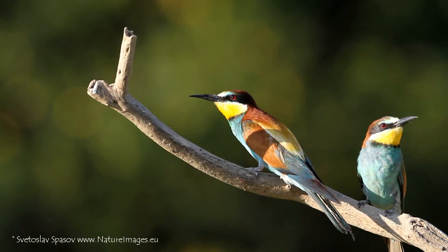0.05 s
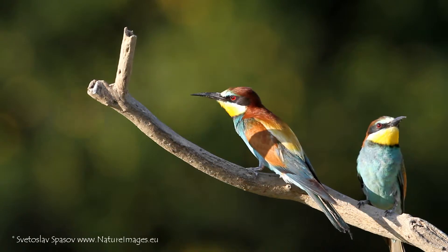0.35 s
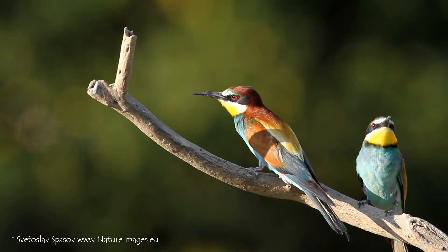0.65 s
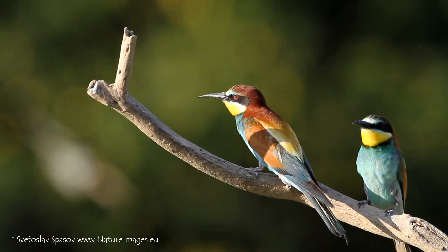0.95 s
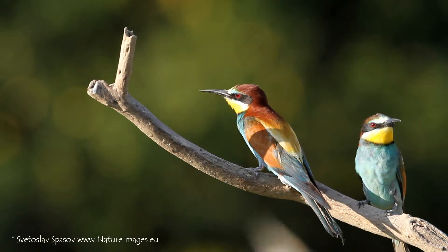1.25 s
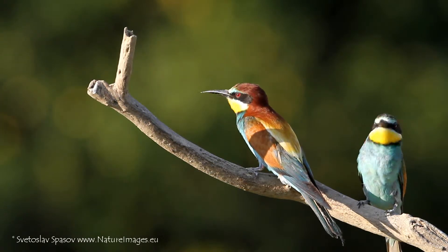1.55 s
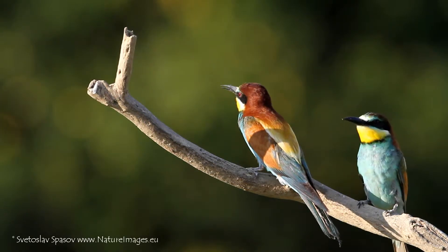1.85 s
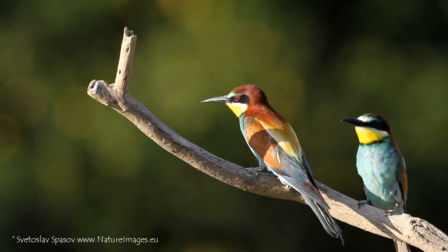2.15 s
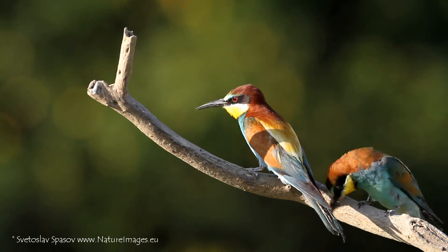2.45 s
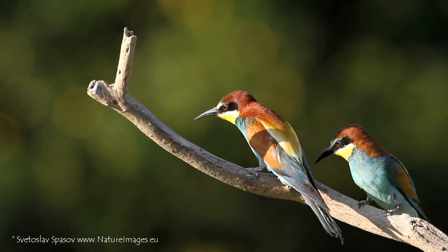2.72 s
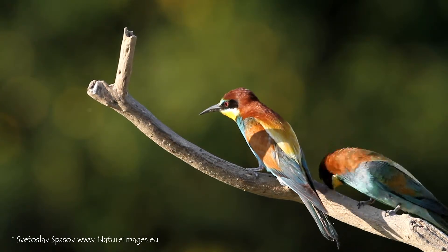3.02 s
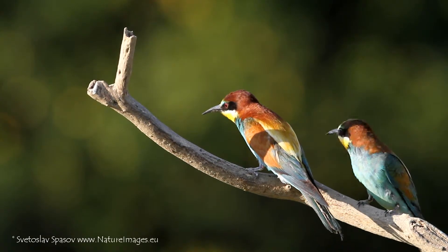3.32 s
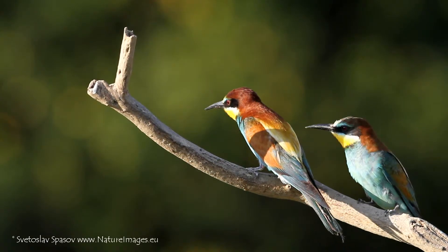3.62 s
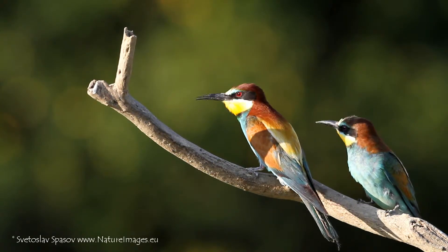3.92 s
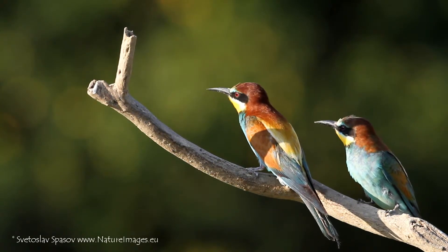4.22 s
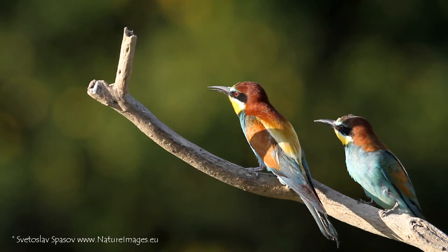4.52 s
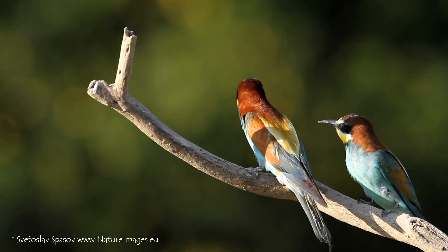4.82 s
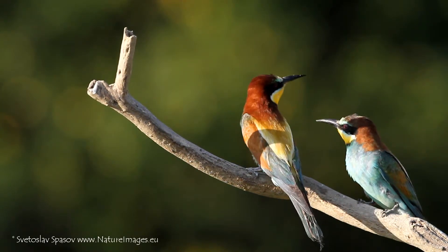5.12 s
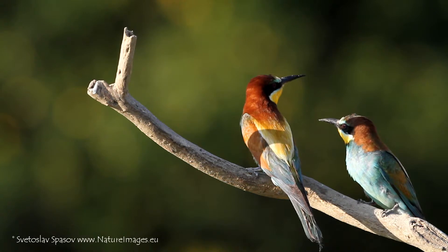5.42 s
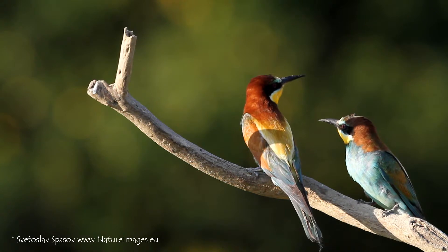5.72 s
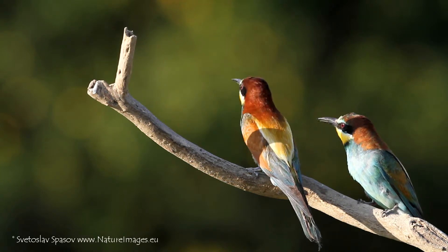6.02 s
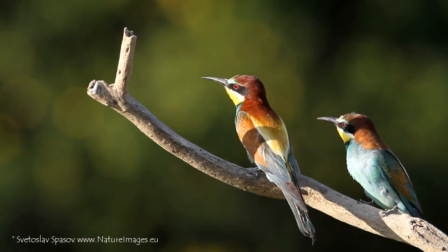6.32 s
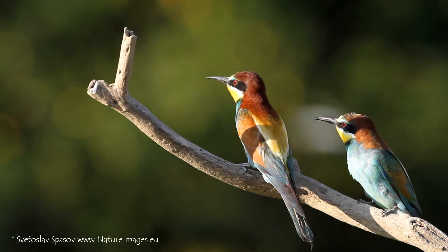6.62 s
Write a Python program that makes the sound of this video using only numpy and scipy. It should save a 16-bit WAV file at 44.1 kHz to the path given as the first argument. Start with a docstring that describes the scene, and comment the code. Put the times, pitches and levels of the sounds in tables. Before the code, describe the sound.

Birds give short, rolling whistles and upswept pips near and far, over a faint rumble, hiss and distant engine.

```python
"""Bee-eaters on a branch

Bee-eaters chatter near the microphone and farther off: short arched whistles that overlap, and a few
dry rasps, clicks of the syrinx ringing the throat. Wings rustle past, claws and bills tick on the wood,
and the trees send back a faint echo. Far off a small bird chirps, over a low rumble, the fading hum
of a distant engine and a steady hiss."""
import sys
import numpy as np
from scipy import signal
from scipy.fft import rfft, irfft, next_fast_len
from scipy.io import wavfile
from scipy.ndimage import map_coordinates

SR = 44100
rng = np.random.default_rng(int(sys.argv[2]) if len(sys.argv) > 2 else 0)


def transcribe(signal):
    """Save signal, clipped to [-1, 1], as a 16-bit WAV file at the path in sys.argv[1]."""
    frames = np.atleast_2d(signal).T
    limited = np.clip(frames, -1, 1)
    pcm = np.round(limited * 32767).astype(np.int16)
    wavfile.write(sys.argv[1], SR, pcm)


N = 298116
TIME = np.arange(N) / SR
FULL_VOICE_DB = -13.5  # a call from the birds nearest the microphone

# long arched calls: crest t/s, rise/s, shoulder f/Hz, crest f/Hz, level/dB, relative overtone level/dB
ROLLS = [(0.178, 0.035, 2066, 2390, -37.5, -37), (.574, 0.042, 1917, 2115, -33, -31),
         (.686, .048, 2040, 2444, -38, -29), (.725, .045, 2170, 2440, -37.5, -32),
         (0.965, 0.043, 2000, 2300, -27.5, -32), (1.354, .046, 1950, 2220, -42, -39),
         (1.573, 0.038, 1935, 2430, -42.5, -35), (2.137, .038, 2010, 2360, -43, -36),
         (2.234, .027, 2040, 2120, -55.5, -30), (2.345, 0.043, 1993, 2400, -44.5, -35),
         (2.523, 0.044, 2008, 2390, -48.5, -28), (2.553, 0.043, 2070, 2400, -57, -21),
         (2.877, .043, 1880, 1980, -33, -28), (2.904, 0.025, 1940, 2430, -42, -37),
         (3.044, 0.035, 1730, 1895, -35.5, -40), (3.136, 0.032, 1960, 2450, -54.5, -37),
         (3.226, .019, 1900, 2000, -40.5, -28), (3.353, 0.052, 2070, 2550, -44, -36),
         (3.381, 0.026, 2070, 2510, -43.5, -34), (3.407, 0.031, 1950, 2365, -39.5, -36),
         (3.448, .042, 1835, 1953, -31, -42), (3.554, .034, 1960, 2410, -43.5, -36),
         (3.629, .039, 1957, 2250, -23, -34.5), (3.714, 0.022, 1868, 1944, -30.5, -39),
         (3.749, 0.041, 1893, 1960, -30.5, -34), (4.358, 0.022, 2010, 2336, -45.5, -40),
         (4.386, .035, 1950, 2390, -40, -31), (4.505, 0.019, 1900, 2080, -36.5, -28),
         (4.646, 0.041, 1907, 2156, -40.5, -25), (5.554, 0.036, 1960, 2387, -41.5, -34),
         (5.789, 0.042, 1818, 1797, -26.5, -38), (6.382, 0.038, 1950, 2423, -36, -28)]
# short upswept calls: crest t/s, rise/s, crest f/Hz, level/dB, relative overtone level/dB
PIPS = [(.149, 0.03, 2186, -36, -23), (.533, .025, 2150, -45, -30), (0.892, 0.027, 2577, -33, -28),
        (1.77, 0.021, 2410, -68, -30), (3.71, 0.018, 2530, -34, -40), (3.775, 0.025, 2210, -36.5, -29),
        (3.827, 0.024, 2650, -32.5, -25), (3.937, 0.029, 2400, -40, -31), (4.225, .03, 2440, -38, -38),
        (4.423, 0.0302, 2286, -41, -17.5), (4.657, 0.026, 2210, -22.5, -24.5),
        (4.729, .027, 2170, -23.5, -38), (4.76, 0.03, 2426, -19, -28), (4.831, 0.035, 2250, -38, -21),
        (4.955, .034, 2490, -17, -27), (5.115, .033, 2314, -20, -27), (5.276, .018, 2240, -45, -26),
        (5.306, 0.039, 2376, -35.5, -28), (5.497, 0.031, 2325, -36, -26), (5.585, .027, 2500, -34, -27),
        (5.795, .022, 2235, -38.5, -21), (5.83, .028, 2340, -36.5, -19.5), (5.964, 0.036, 2574, -20, -35.5),
        (6.071, 0.019, 1894, -40, -25), (6.124, .026, 2260, -35.5, -25), (6.198, 0.039, 2483, -21, -32.5),
        (6.468, .027, 2410, -56, -22)]
# soft low contact notes: crest t/s, crest f/Hz, level/dB
PEEPS = [(3.165, 1400, -55), (3.275, 1734, -41.5), (3.411, 1725, -39), (3.678, 1774, -40),
         (3.999, 1630, -42.5), (4.293, 1595, -50), (4.321, 1660, -50), (4.352, 1680, -52),
         (4.391, 1600, -47)]
# how well the throat carries each pitch: f/Hz, gain/dB
THROAT_GAIN = [(1200, 1), (1450, 0), (1650, 0.5), (1850, 0.5), (2000, -1), (2200, 1), (2450, 0),
               (2650, -2.5)]
# second, third and fourth harmonic of a whistle: relative level/dB
OVERTONES_DB = [0, -5, -11]
# what the open bill lets out of the overtones: f/Hz, gain/dB
BILL_GAIN = [(2800, 12), (3400, -2), (4200, 1), (5200, -1.5), (6200, -6), (7500, -8), (10000, -6)]
# dry rasps: start t/s, length/s, level/dB, throat size as a pitch factor
RASPS = [(3.911, 0.045, -46.5, 0.95), (4.018, 0.034, -46.5, 0.89), (6.522, 0.044, -41.5, 1.165),
         (6.616, 0.047, -44.5, 0.99)]
# throat resonances: f/Hz, width/Hz, gain/dB
THROAT_MODES = [(880, 170, -0.5), (1227, 230, 7.5), (2080, 1060, 7.5), (2600, 530, 1), (3980, 660, -19)]
# thin squeaks on some crests: middle t/s, half length/s, level/dB
SQUEAKS = [(.965, 0.0068, -56), (5.958, .012, -57), (6.195, .012, -55)]
# squeak spectrum: f/Hz, level/dB
SQUEAK_SPECTRUM = [(12000, -40), (13500, -4), (14700, 0), (15600, -8)]

# wing swishes: middle t/s, half length/s, level/dB
SWISHES = [(1.12, 0.052, -48), (1.375, 0.047, -50), (2.56, 0.023, -64), (2.695, 0.01, -63)]
# swish resonances: f/Hz, width/Hz, gain/dB
SWISH_MODES = [(1700, 300, 0), (2400, 900, -7), (3000, 260, -1), (4300, 1100, -12)]
# soft wing flutters: middle t/s, half length/s, level/dB
FLUTTERS = [(.8, 0.19, -55.5), (1.02, 0.017, -54)]
# flutter spectrum: f/Hz, level/dB
FLUTTER_SPECTRUM = [(400, -14), (900, -6.5), (1300, 1), (1800, -3), (2800, -11), (5000, -21.5)]
# feather rustles: middle t/s, half length/s, level/dB
RUSTLES = [(.77, .025, -63), (.86, 0.16, -62), (.97, 0.061, -71), (3.02, 0.086, -64), (5.15, 0.12, -63.5)]
# rustle spectrum: f/Hz, level/dB
RUSTLE_SPECTRUM = [(1500, -11), (4000, -7), (9000, -4.5), (14000, -5), (16000, -19)]
# taps on the branch: t/s, level/dB
TAPS = [(1.1052, -40), (2.561, -46), (2.614, -45), (2.688, -47), (3.0366, -45), (3.062, -47), (3.1701, -45)]
# resonances of the tapped wood: f/Hz, width/Hz, gain/dB
WOOD_MODES = [(3340, 1000, -6.5), (4640, 350, -1.5), (6300, 1400, -12)]

# high chirps of a small far bird: middle t/s, level/dB
CHIRPS = [(1.348, -71), (1.7, -70), (2.2, -71), (2.48, -67), (5.42, -69), (5.65, -67), (5.9, -67),
          (6.25, -71), (6.48, -68)]
# chirp spectrum: f/Hz, level/dB
CHIRP_SPECTRUM = [(4800, -37), (5900, 0), (6700, 2), (7100, -9), (7900, -35)]
# drone of the receding engine: t/s, level/dB
DRONE_LEVEL = [(0, -58), (2.4, -58.2), (4.7, -61), (6.76, -64.5)]
# drone spectrum: f/Hz, level/dB
DRONE_SPECTRUM = [(150, -5), (260, -3.5), (330, 4), (520, 4.5), (800, 0.5), (1100, -3.5), (1600, -6),
                  (3000, -62)]
# the engine's note: t/s, f/Hz, level/dB
ENGINE_HUM = [(0, 451.7, -67.5), (1, 450, -65.5), (2.3, 442.2, -63), (4.2, 441.7, -66.5), (5.6, 436, -67),
              (6, 442, -76.5), (6.76, 443.5, -72)]
# slow drift of the rumble: t/s, level/dB
RUMBLE_LEVEL = [(0, -60.5), (2, -59.5), (2.9, -62), (4.7, -61), (5.1, -58.5), (6.76, -60)]
# rumble spectrum: f/Hz, level/dB
RUMBLE_SPECTRUM = [(13, -45), (22, -45), (46, -21), (81, -3.5), (114, 4), (210, -2), (257, -10), (330, -13),
                   (430, -36), (730, -120)]
# tones within the rumble: f/Hz, level/dB
LOW_TONES = [(59, -68.5), (120, -70.5), (171, -70.5), (207, -73)]
# spectrum of the open-air hiss: f/Hz, level/dB
HISS_SPECTRUM = [(600, 2.5), (1100, -0.5), (2000, 5.5), (2800, 0), (4000, 0), (5500, -1.5), (8000, -3),
                 (11000, -4.5), (14000, -4)]


def whistles(attack_s=0.0057, release_s=0.0034, jitter=0.0105, shimmer_db=1.5, patchy_db=3,
             fade_db_per_s=330, overtone_fade_db=4, scatter_slope=0.62):
    """Notes glide to a shoulder, flick over a crest and drop; returns direct and scattered sound."""
    direct, scattered = np.zeros(N), np.zeros(N)
    tremor = 1 + jitter * wobble(450)
    shimmer = amp(shimmer_db * wobble(300))
    brightness = amp(patchy_db * wobble(120) - patchy_db / 2)
    for s, rise, fall, crest_width, contour, db, swell_db, overtone_db in rolls() + pips() + peeps():
        start_hz, shoulder_hz, crest_hz, end_hz = contour
        span = slice(round((s - rise) * SR), round((s + fall) * SR))
        t = TIME[span] - s  # zero at the crest
        up, down = np.clip(1 + t / rise, 0, 1), np.clip(t / fall, 0, 1)
        arch = start_hz + (shoulder_hz - start_hz) * up ** 0.61 + (end_hz - shoulder_hz) * down ** 1.75
        pitch = arch + (crest_hz - shoulder_hz) * np.exp(-(t / crest_width) ** 2)
        phase = 2 * np.pi * np.cumsum(pitch * tremor[span]) / SR
        ramps = np.clip((t + rise) / attack_s, 0, 1) * np.clip((fall - t) / release_s, 0, 1)
        gate = np.sin(np.pi / 2 * ramps) ** 2
        # a note swells late, towards its crest, and dies away past it
        swell = amp(-swell_db * (1 - up ** 1.39) - fade_db_per_s * np.maximum(t, 0))
        fundamental = swell * amp(along(THROAT_GAIN, pitch)) * np.sin(phase)
        harmonics = sum(amp(level + along(BILL_GAIN, k * pitch)) * np.sin(k * phase)
                        for k, level in enumerate(OVERTONES_DB, 2))
        # the overtones barely swell: they are there from the start
        overtone_gain = amp(overtone_db - overtone_fade_db * down) * brightness[span] * swell ** 0.17
        note = amp(db) * gate * shimmer[span] * (fundamental + overtone_gain * harmonics)
        direct[span] += note
        # softer notes come from farther birds, so more is scattered on the way to the microphone
        scattered[span] += note * amp(scatter_slope * (FULL_VOICE_DB - db))
    return direct, scattered


def rolls(fall_share=0.62, crest_s=0.0028, flick_hz_per_s=110000, swell_db=8):
    """A roll climbs slowly, flicks over its crest and sinks back; a higher flick takes longer."""
    return [(s, rise, fall_share * rise, crest_s + (crest_hz - hz) / flick_hz_per_s,
             (0.82 * hz, hz, crest_hz, 0.805 * hz), db, swell_db, overtone_db)
            for s, rise, hz, crest_hz, db, overtone_db in ROLLS]


def pips(start_hz=1396, fall_s=0.0098, crest_s=0.00658, swell_db=16):
    """A pip sweeps up, swelling steeply, and breaks off just past its crest; loud ones plunge."""
    notes = []
    for s, rise, hz, db, overtone_db in PIPS:
        end_share = 0.69 + 0.007 * (FULL_VOICE_DB - db)
        contour = (start_hz, 0.855 * hz, hz, end_share * hz)
        notes.append((s, rise, fall_s, crest_s, contour, db, swell_db, overtone_db))
    return notes


def peeps(rise_s=0.013, fall_s=0.009, crest_s=0.0055, swell_db=8, overtone_db=-35):
    """A peep is one small low arch, always of the same length."""
    return [(s, rise_s, fall_s, crest_s, (0.76 * hz, 0.89 * hz, hz, 0.94 * hz), db, swell_db, overtone_db)
            for s, hz, db in PEEPS]


def rasps(clicks_per_s=430, jitter=0.24, spread_db=2.0, hiss=0.076, fade_db=7):
    """Uneven clicks of the syrinx ring the throat, with a little hiss between them."""
    out = np.zeros(N)
    for s, length, db, size in RASPS:
        t = np.arange(round((length + 0.03) * SR)) / SR
        cycles = np.cumsum(clicks_per_s * np.abs(1 + jitter * wobble(400)[:len(t)])) / SR
        clicks = np.diff(np.floor(cycles), prepend=-1) * amp(spread_db * rng.standard_normal(N)[:len(t)])
        source = clicks + hiss * rng.standard_normal(N)[:len(t)]
        voice = filtered(source, lambda f: resonances(THROAT_MODES, f / size) * lowpass(f / size, 4500, 10))
        envelope = amp(-fade_db * (t / length) ** 3) * np.clip((t[-1] - t) / 0.017, 0, 1)
        add(out, s, amp(db) * envelope * unit(voice))
    return out


def squeaks():
    """Thin puffs of very high noise sit on the crests of a few notes."""
    return swells(SQUEAKS) * noise(SQUEAK_SPECTRUM)


def wings(grain_db=2, flutter_db=3, crackle_db=4):
    """Wings swish and flutter past the microphone; feathers brush over each other in fine grains."""
    air = filtered(rng.standard_normal(N), lambda f: resonances(SWISH_MODES, f) * lowpass(f, 6500, 6))
    swish = swells(SWISHES) * unit(air * amp(grain_db * wobble(300)))
    flutter = swells(FLUTTERS) * unit(noise(FLUTTER_SPECTRUM) * amp(flutter_db * wobble(200)))
    rustle = swells(RUSTLES) * unit(noise(RUSTLE_SPECTRUM) * amp(crackle_db * wobble(250)))
    return swish + flutter + rustle


def taps(t60=0.035, gain_db=-2):
    """Claws and bills tick on the dry branch, briefly ringing the wood."""
    out, t = np.zeros(N), np.arange(SR // 20) / SR
    for s, db in TAPS:
        burst = rng.standard_normal(len(t)) * amp(-60 * t / t60)
        tick = filtered(burst, lambda f: resonances(WOOD_MODES, f))
        add(out, s, amp(db + gain_db) * tick / np.abs(tick).max())
    return out


def twigs(x, t60=0.045, gain_db=-18):
    """Nearby twigs and ground briefly smear each note, differently as the birds move."""
    out, t = np.zeros(N), np.arange(SR // 6) / SR
    for s in np.arange(0, TIME[-1] + 0.5, 0.5):
        tail = rng.standard_normal(len(t)) * amp(-60 * t / t60) * (1 - np.exp(-t / 0.0027))
        crossfade = np.clip(1 - 2 * np.abs(TIME - s), 0, 1)
        out += signal.oaconvolve(x * crossfade, tail / np.linalg.norm(tail))[:N]
    return amp(gain_db) * out


def trees(x, t60=1.0, foliage_db=-22.5, trunks_db=-20, delay_s=0.071, spread_s=0.041, count=18,
          centre_hz=2080, width_hz=800, dull_hz=2550):
    """Foliage scatters a thin, dull tail; farther trunks return a cluster of small repeats."""
    t = np.arange(SR * 3 // 4) / SR
    foliage = rng.standard_normal(len(t)) * amp(-60 * t / t60) * (1 - np.exp(-t / 0.0083))
    foliage *= amp(foliage_db) / np.linalg.norm(foliage)
    delays = delay_s + spread_s * np.linspace(-1, 1, count) + 0.004 * rng.standard_normal(count)
    arrivals = np.round(np.clip(delays, 0.01, 0.5) * SR).astype(int)
    trunks = np.bincount(arrivals, rng.standard_normal(count), len(t))
    trunks *= amp(trunks_db) / np.linalg.norm(trunks)
    echo = signal.fftconvolve(x, foliage + trunks)[:N]
    return filtered(echo, lambda f: resonances([(centre_hz, width_hz, 0)], f) * lowpass(f, dull_hz, 16))


def path_to_microphone(x, notch_hz=2298, width_hz=100, bounce=0.083, delay_s=0.002403):
    """One near reflection ripples the sound, and a narrow band cancels: notes blink gliding through it."""
    notch = lambda f: (notch_hz ** 2 - f * f) / (notch_hz ** 2 - f * f + 1j * f * width_hz)
    ripple = lambda f: 1 + bounce * np.exp(-2j * np.pi * f * delay_s)
    return filtered(x, lambda f: notch(f) * ripple(f))


def far_bird(half_length_s=0.036):
    """Distance blurs a small bird's chirps into soft narrow-band puffs."""
    return swells((s, half_length_s, db) for s, db in CHIRPS) * noise(CHIRP_SPECTRUM)


def distant_engine():
    """An engine recedes far from the microphone: a fading drone and a slowly sinking hum."""
    drone = amp(along(DRONE_LEVEL, TIME) + 0.49 * wobble(7.9)) * noise(DRONE_SPECTRUM)
    s, hz, db = np.transpose(ENGINE_HUM)
    return drone + wavering_tone(np.interp(TIME, s, hz), np.interp(TIME, s, db))


def ambience(hiss_db=-58.0):
    """The bed of the place: a low rumble with wavering tones, and an even hiss."""
    rumble = amp(along(RUMBLE_LEVEL, TIME)) * noise(RUMBLE_SPECTRUM)
    tones = sum(wavering_tone(hz, db) for hz, db in LOW_TONES)
    return rumble + tones + amp(hiss_db) * noise(HISS_SPECTRUM)


def wavering_tone(hz, db, waver_db=1.7, waver_hz=3.36):
    """A sine whose level and pitch wander."""
    gain = np.sqrt(2) * amp(db + waver_db * wobble(7.8))
    return gain * np.sin(2 * np.pi * np.cumsum(hz + waver_hz * wobble(18)) / SR)


def amp(db):
    """Decibels to gain."""
    return 10 ** (np.asarray(db) / 20)


def unit(x):
    """Scale to rms 1."""
    return x / np.sqrt(np.mean(x ** 2) + 1e-20)


def add(track, s, sound):
    """Mix a sound into a track from time s."""
    part = track[max(round(s * SR), 0):][:len(sound)]
    part += sound[:len(part)]


def along(points, x):
    """Read (x, value) points joined by straight lines."""
    return np.interp(x, *np.transpose(points))


def wobble(rate):
    """A smooth random curve, rate knots a second."""
    return map_coordinates(rng.standard_normal(int(N * rate / SR) + 4), [TIME * rate])


def swells(rows):
    """Bell-shaped gains from rows of middle t/s, half length/s, level/dB."""
    return sum(amp(db) * np.exp(-((TIME - s) / half) ** 2) for s, half, db in rows)


def filtered(x, response):
    """Pass x through a complex frequency response."""
    m = next_fast_len(len(x) + 8192)
    return irfft(rfft(x, m) * response(np.fft.rfftfreq(m, 1 / SR)), m)[:len(x)]


def lowpass(f, corner_hz, order):
    """Treble roll-off, at half gain on the corner."""
    return 1 / (1 + (f / corner_hz) ** order)


def resonances(modes, f):
    """Causal response of resonances given as f/Hz, width/Hz, gain/dB."""
    return sum((-1) ** k * amp(db) * 1j * f * width / (hz * hz - f * f + 1j * f * width)
               for k, (hz, width, db) in enumerate(modes))


def noise(spectrum):
    """Noise of rms 1 coloured by points of f/Hz, level/dB."""
    hz, db = np.transpose(spectrum)
    colour = lambda f: amp(np.interp(np.log(f + 1), np.log(hz), db))
    return unit(filtered(rng.standard_normal(N), colour))


def scene(far_share=0.1):
    """One microphone by the branch: the birds, their echoes and the background beyond."""
    direct, scattered = whistles()
    birds = direct + rasps() + wings() + taps()
    echoes = twigs(scattered) + trees(birds + far_share * (scattered - direct))
    flock = path_to_microphone(birds + echoes) + squeaks()
    return (flock + far_bird() + distant_engine() + ambience())[None]


def record(dry):
    """The recorder rolls off just under its band limit and keeps nothing above it."""
    limit_hz = 15780
    band = lambda f: (f < limit_hz) * lowpass(f, limit_hz, 30)
    return np.array([filtered(channel, band) for channel in dry])


dry = scene()
out = record(dry)
transcribe(out)
```